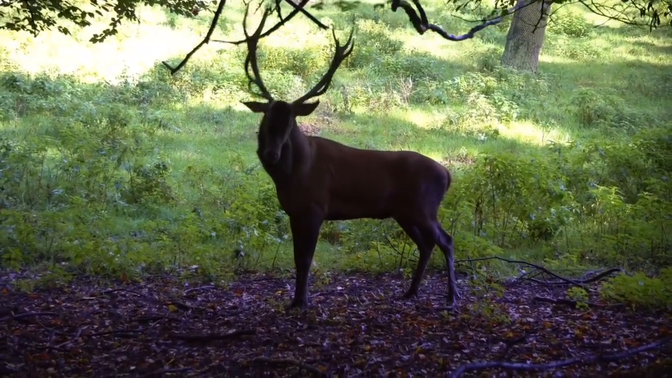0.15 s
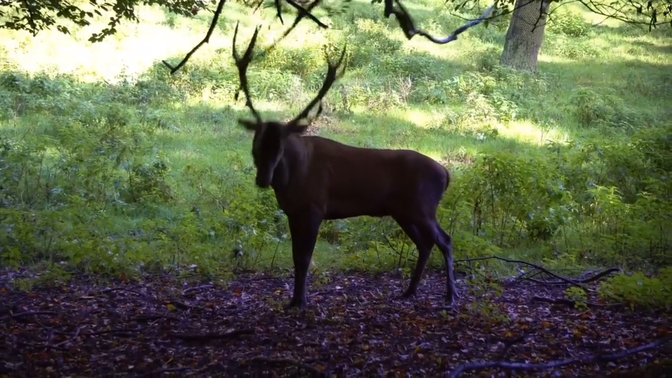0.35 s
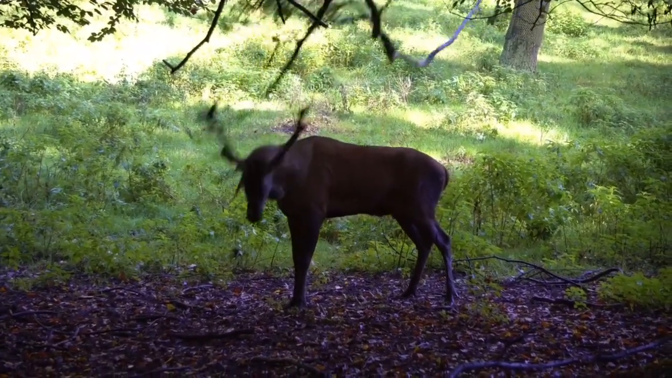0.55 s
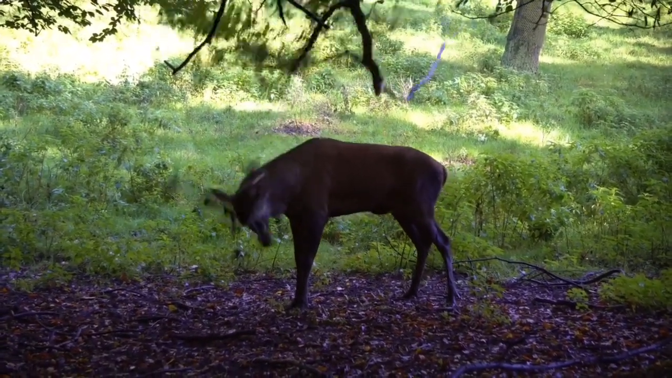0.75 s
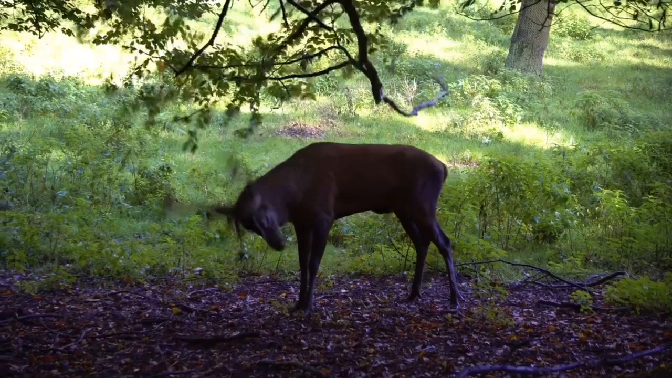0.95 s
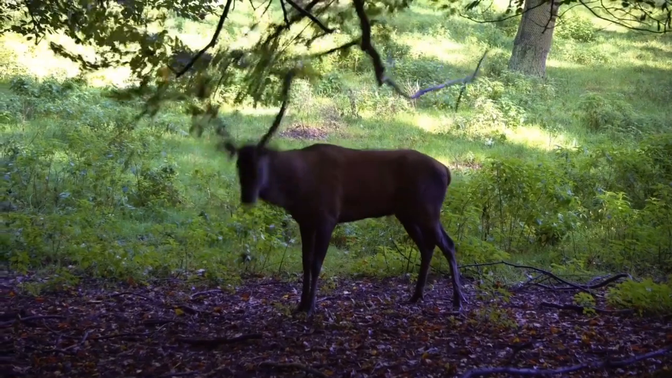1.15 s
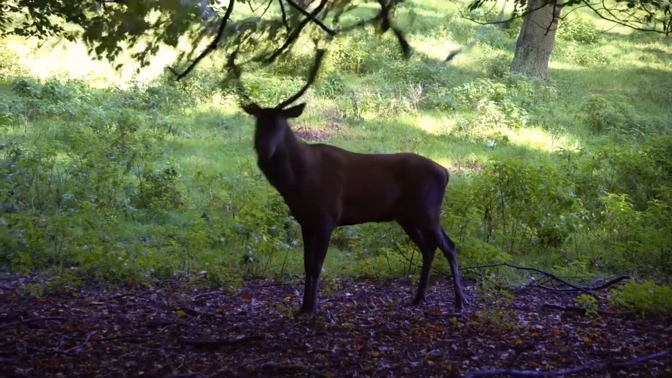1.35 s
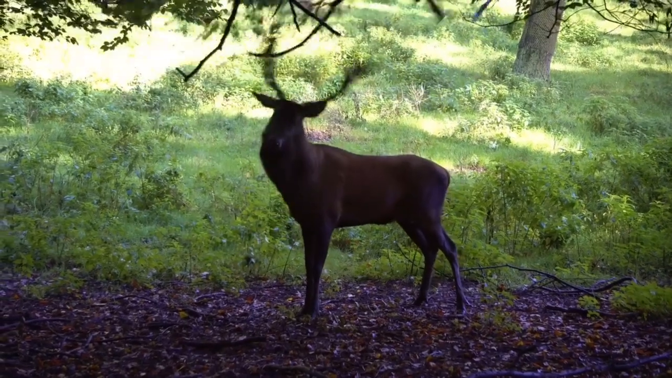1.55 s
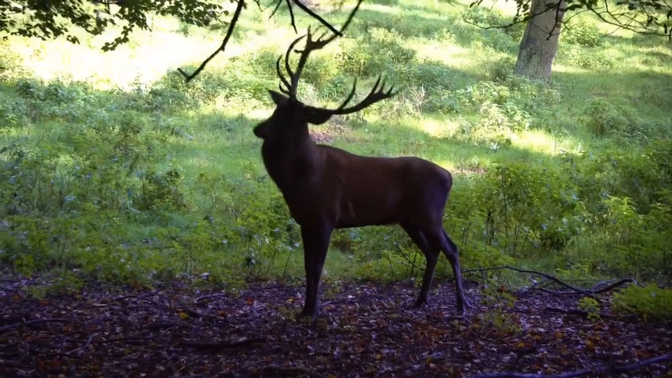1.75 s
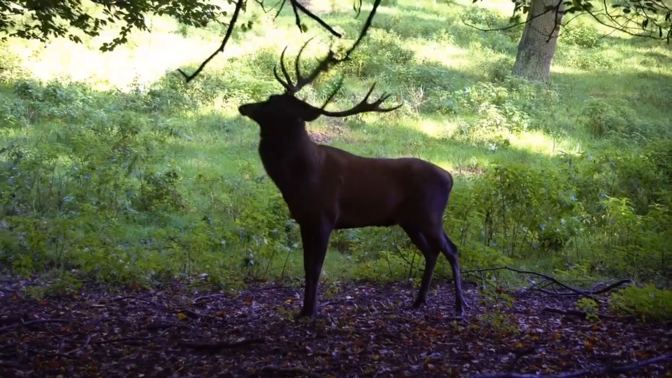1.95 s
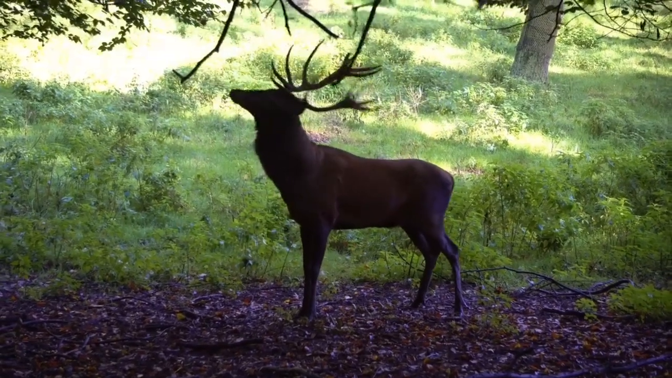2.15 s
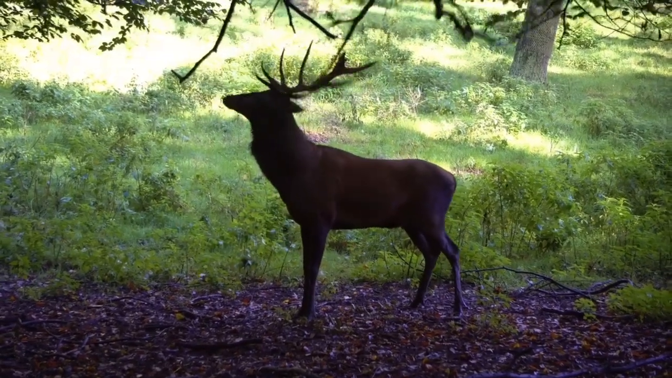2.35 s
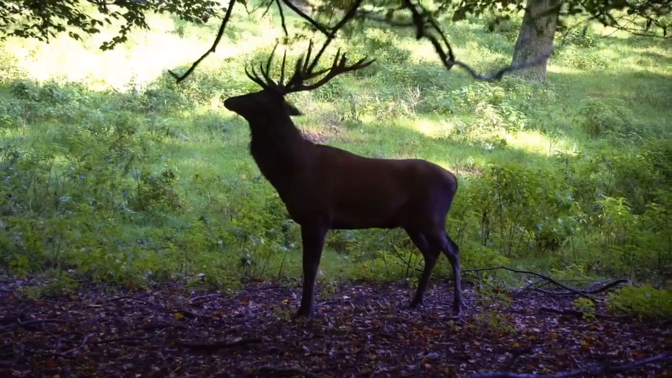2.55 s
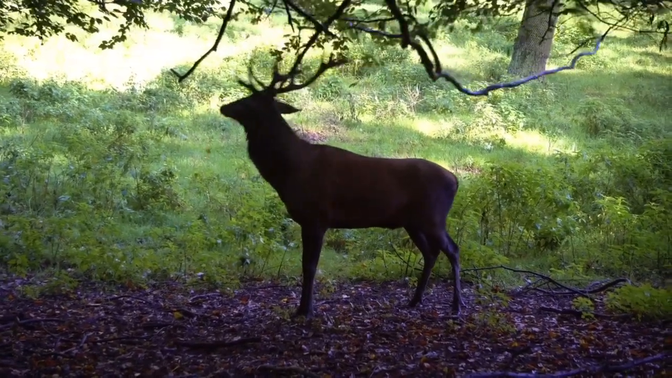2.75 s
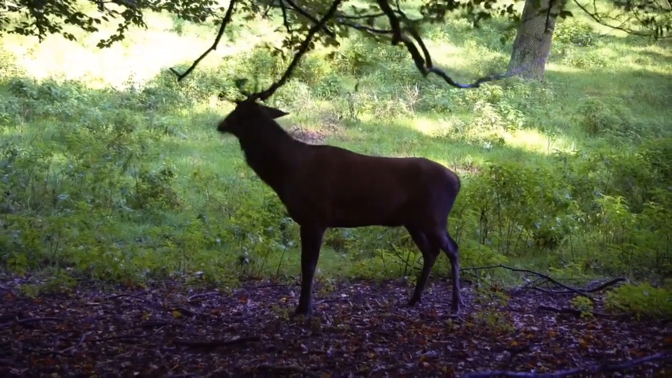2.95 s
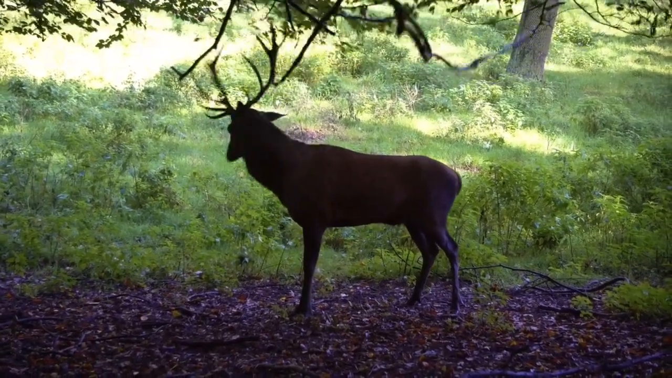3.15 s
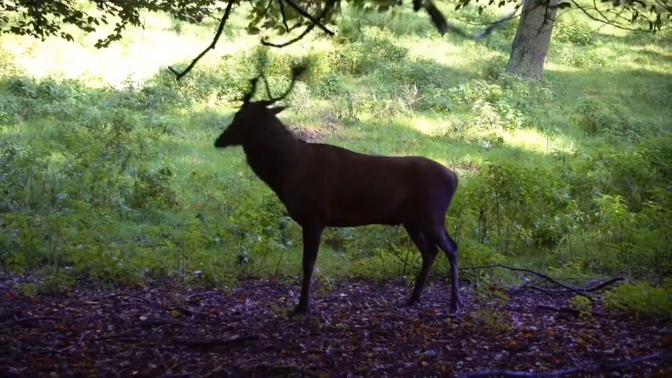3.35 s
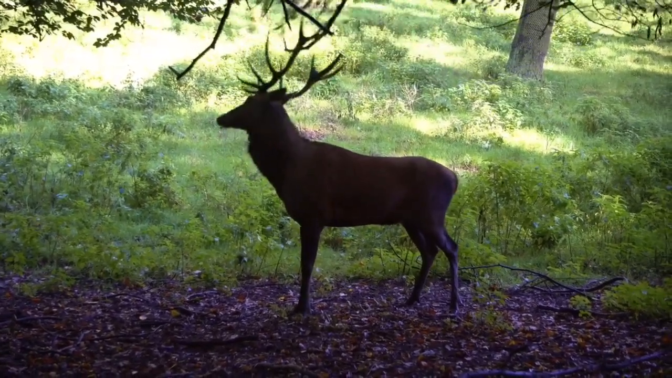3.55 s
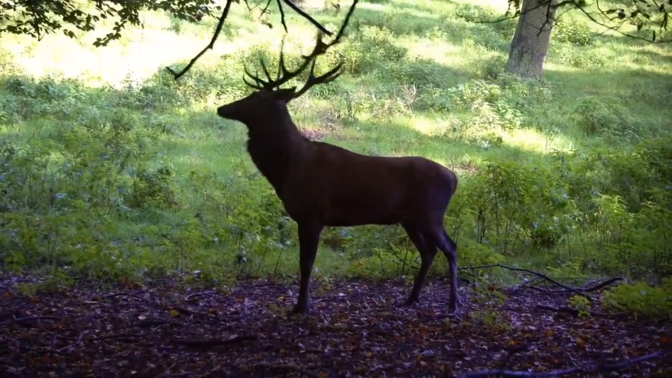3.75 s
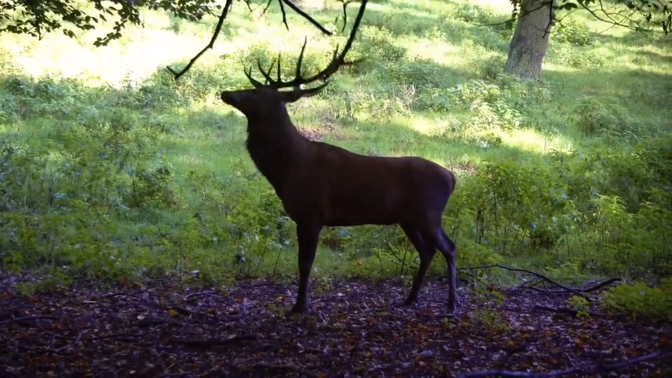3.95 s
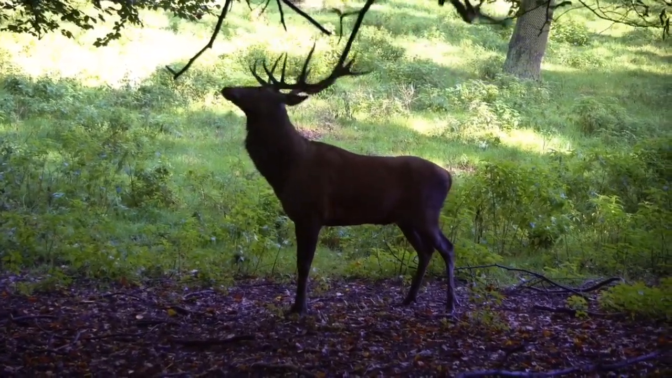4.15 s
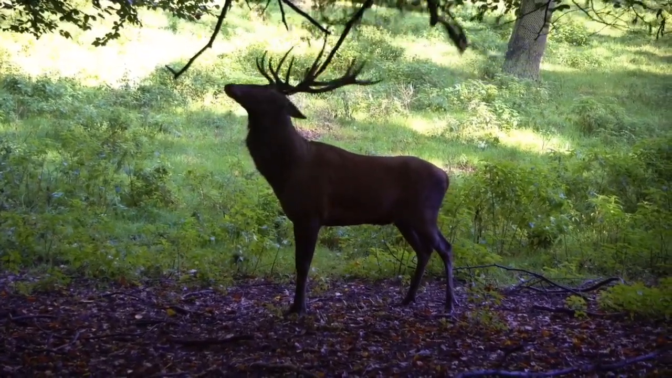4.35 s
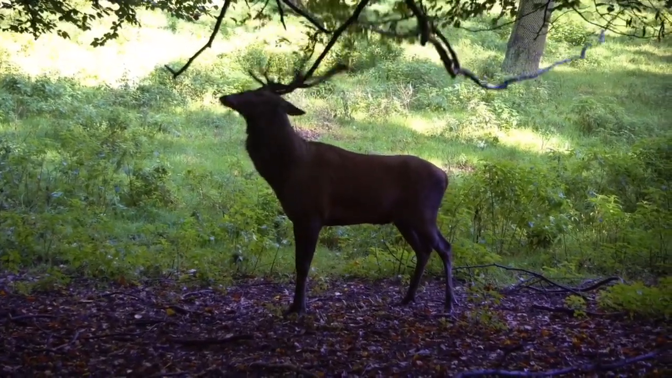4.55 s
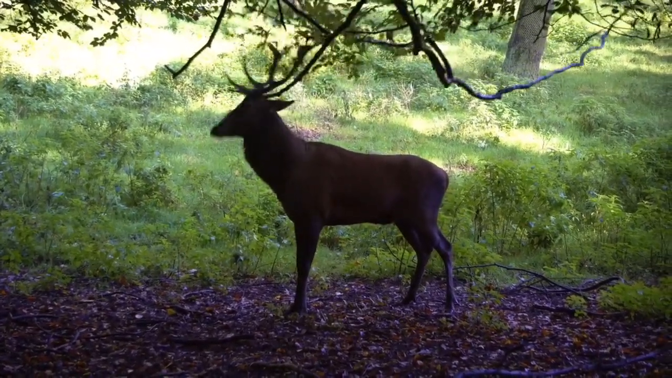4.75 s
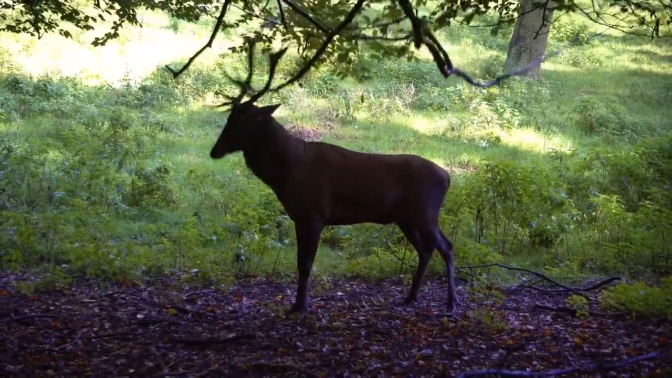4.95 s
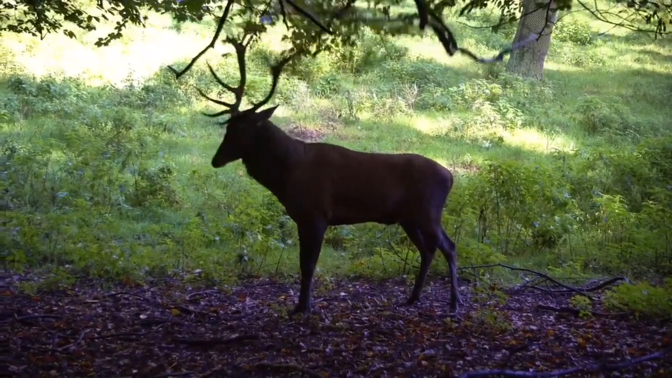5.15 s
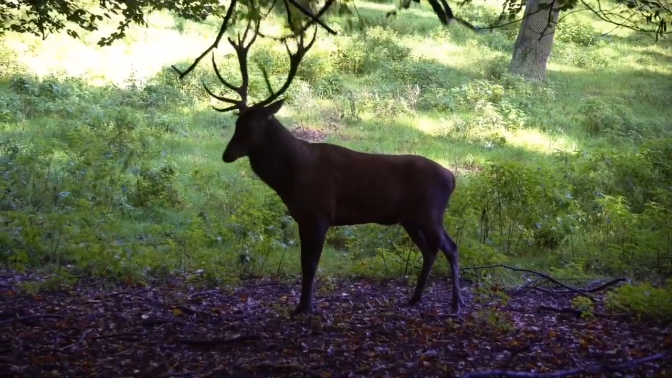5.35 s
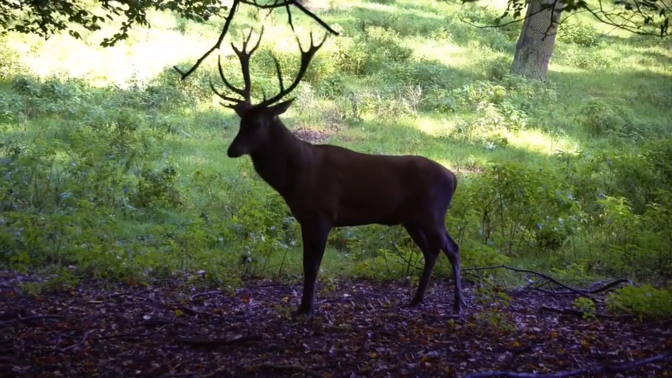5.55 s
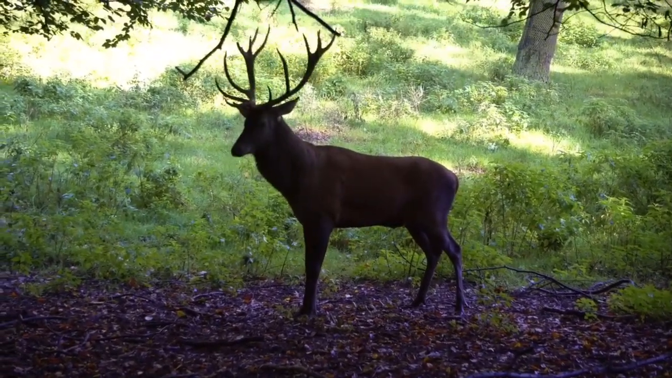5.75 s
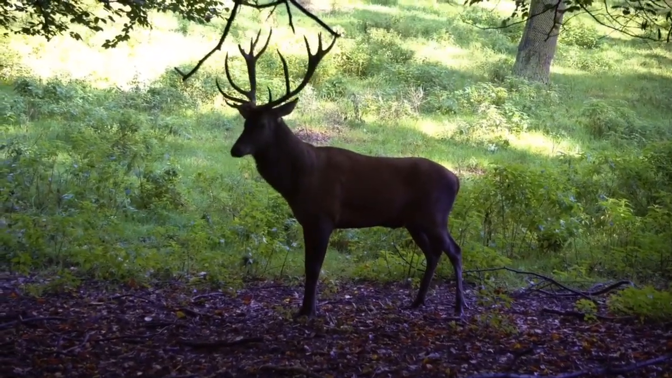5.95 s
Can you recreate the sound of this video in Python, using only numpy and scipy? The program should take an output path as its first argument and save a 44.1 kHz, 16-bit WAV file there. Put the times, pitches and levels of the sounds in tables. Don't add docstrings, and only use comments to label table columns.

```python
import sys
import numpy as np
from scipy import signal
from scipy.fft import rfft, irfft
from scipy.io import wavfile
from scipy.ndimage import uniform_filter1d

SR = 44100
rng = np.random.default_rng(int(sys.argv[2]) if len(sys.argv) > 2 else 0)


def volts(x):
    e = np.asarray(x, float) / 20
    return 10 ** e


def digitize_waveform(pressure):
    field = np.atleast_2d(pressure).T
    bounded = np.clip(field, -1, 1)
    quanta = np.round(bounded * 32767).astype(np.int16)
    wavfile.write(sys.argv[1], SR, quanta)


N = 264159

# frequency in Hz, level in dB, t60 in seconds.
WOOD_MODES = [(195, -9, .14), (257, -8, .13), (369, 2, .15), (450, -5, .07), (529, -1, .13), (615, -1, .12),
              (700, -5, .07), (769, 1, .13), (855, -6, .07), (938, -4, .08), (1065, -5, .05),
              (1170, -3, .06), (1320, -6, .045), (1440, -4, .05), (1690, -5, .035), (1830, -7, .03),
              (2070, -6, .03), (2400, -9, .025), (2900, -10, .02), (3400, -13, .02)]
# start in seconds, peak in dB, centre of the ring in Hz,
# damping by the antler as a factor on t60.
KNOCKS = [(0.354, -47, 780, 0.72), (0.526, -52, 377, 0.37), (0.662, -25.5, 1150, 0.52),
          (0.763, -36.5, 1280, 0.37), (1.193, -24.5, 1230, 0.86), (1.2, -18, 1720, 0.66),
          (1.344, -17.5, 930, 0.3), (1.405, -28.5, 1050, 0.3), (1.44, -27, 720, 0.69),
          (1.752, -39, 1110, 0.42), (1.841, -42, 810, 0.64), (2.567, -37.5, 1360, 0.53),
          (2.889, -40.5, 895, 1), (3.287, -15.5, 674, 0.99), (3.41, -13, 760, 0.5),
          (3.889, -45.5, 1350, 0.57), (5.25, -42.5, 470, 0.58), (5.484, -44, 424, 0.8),
          (5.5, -25.5, 1700, 0.38)]
KNOCK_SPREAD_OCT, KNOCK_MS = 0.89, 4.76
# start in seconds, peak in dB, centre in Hz, spread in octaves.
GRINDS = [(0.426, -32.5, 1010, 1.6), (1.361, -33, 1090, 1.1), (1.655, -37, 500, 1.57),
          (2.315, -35.5, 470, 2.5), (2.344, -30.5, 463, 2.1), (2.371, -24.5, 940, 0.76),
          (2.414, -28, 1110, 1.1), (2.658, -45.5, 1460, 0.9), (3.102, -40.5, 910, 1.2),
          (3.31, -18, 740, 1.8), (3.439, -26.5, 770, 1.5), (3.682, -34, 690, 2.1), (4.272, -36, 900, 3.1),
          (4.292, -30, 900, 3.3), (4.997, -38, 750, 2.5)]
GRIND_MS, GRIND_DAMPING = 11.83, 0.41
# start in seconds, peak in dB, centre in Hz, spread in octaves.
TAPS = [(2.384, -31, 590, 0.64), (2.426, -29, 1060, 0.29), (3.181, -36.5, 870, 0.41), (4.3, -36, 603, 0.41),
        (5.011, -36, 790, .8), (5.067, -48.5, 765, 0.33), (5.091, -35.5, 770, .6),
        (5.284, -30.5, 620, 0.27), (5.325, -37, 615, 0.37)]
TAP_MS, TAP_DAMPING = 6.22, 0.64
# hardest push in seconds, level in dB, seconds to build 20 dB,
# seconds to lose 20 dB.
DRAGS = [(0.01, -58, -5, -0.5), (0.63, -47, 0.47, 0.43), (1.37, -37.5, 0.26, 0.3), (1.7, -48, -0.2, 0.32),
         (2.53, -53, 0.9, 1), (3.35, -42, .4, -0.07), (3.57, -43, -0.3, 0.76), (5.59, -47, -1.2, -1)]
WOOD_CUT_HZ = 248
# start in seconds, peak in dB, centre in Hz, strength of its echo in dB.
CRACKS = [(0.428, -39.5, 2170, 1), (0.6614, -27, 1500, -2.5), (1.2021, -8, 2520, -5.5),
          (1.238, -32, 2880, 12.5), (1.3471, -14.5, 1960, -7.5), (1.4433, -30, 1520, 1),
          (1.7493, -37, 1560, 3.5), (2.329, -37, 1310, 4), (2.3842, -30, 2270, 1.5),
          (2.4248, -28, 1870, -8), (2.6718, -37, 1670, -8), (2.718, -28, 3400, -24),
          (2.7463, -37, 1910, -19), (2.8898, -43, 3750, -3), (3.2249, -30.5, 1700, -1.5),
          (3.2924, -15, 2040, -7), (3.4135, -13.5, 1460, -6.5), (4.303, -39.5, 2000, -3.5),
          (4.9848, -42, 2980, -5), (5.2514, -42.5, 2160, -10), (5.2848, -22, 2180, -8),
          (5.4997, -25.5, 1950, -7)]
CRACK_SPREAD_OCT, CRACK_MS = 0.83, 3.2
THROWN_PITCH, THROWN_SPREAD = 0.83, 1.41
# time in seconds, level in dB.
SHAKE = [(0.0, -61.5), (0.33, -64.5), (0.43, -54.5), (0.57, -55), (0.72, -49), (0.86, -47), (0.95, -42.5),
         (1.17, -45.5), (1.38, -50), (1.72, -46), (1.97, -50.5), (2.38, -50), (2.62, -52), (2.87, -55.5),
         (3.17, -56), (3.97, -55.5), (4.4, -59), (5.99, -56.5)]
# start in seconds, peak in dB, dying time (t60) in seconds, first tick
# in dB (16 makes it as strong as the burst).
FLICKS = [(0.4294, -43, 0.087, 5), (0.5554, -45, 0.12, 1.5), (0.6646, -36, 0.094, 3),
          (0.7614, -31.5, 0.33, 3), (0.938, -42, 0.9, 3), (1.3473, -33.5, 0.2, -6), (1.732, -39, 0.068, -1),
          (1.7905, -38, 0.1, 0), (2.2828, -37.5, 0.32, 35), (2.501, -39, 0.33, 0), (2.6718, -37, 0.061, 12),
          (2.7163, -26.5, 0.2, -3), (2.745, -21.5, 0.35, -13), (2.891, -38, 0.26, -4),
          (3.1115, -44, 0.51, -2), (3.1994, -32.5, 0.5, -5), (3.224, -29.5, 0.12, -10),
          (3.293, -31, 0.46, 1.5), (3.411, -30.5, 0.29, 29), (3.8965, -38.5, 0.14, 3),
          (3.991, -42, 0.078, 10), (4.868, -40, 0.16, -8), (5.106, -38, 0.13, -5), (5.1826, -60, 0.043, 6),
          (5.5024, -40.5, 0.6, 0), (5.738, -38.5, 0.78, -6)]
FLICK_RISE_S = 0.0067
# frequency in Hz, level in dB per Hz.
THIN_COLOUR = [(1500, -31), (2500, -6), (3400, -2), (4500, -3), (6500, -4.5), (9000, -3.5), (12800, -7.5),
               (16000, -12)]
# frequency in Hz, level in dB per Hz.
BIG_COLOUR = [(180, -68), (300, -30), (590, -1), (828, -9.5), (962, -1), (2230, 4.5), (2940, 0.5),
              (3370, 1.5), (6000, -15.5), (7800, -48), (13200, -120)]
# start in seconds, level in dB, top pitch in Hz, length in seconds.
NOTES = [
    (3.139, -45, 6900, .03),
    (3.237, -41, 7300, .026),
    (3.329, -43, 7000, .02),
]
# frequency in Hz, t60 in seconds, level in dB.
TREES = [(310, 0.43, 1), (1080, 0.62, -3.5), (1850, 0.71, -0.5), (3400, 0.56, 3), (4370, 0.8, -3.5),
         (6600, 0.66, 2), (10400, 0.37, -0.5)]
# frequency in Hz, level in dB per Hz.
FAR_COLOUR = [(15, -53), (25, -19), (49, 2), (170, -11), (363, -1.5), (591, 1.5), (659, 3), (1370, -2),
              (2110, -11), (6050, -9.5), (9320, -5.5), (14800, -12), (16000, -7)]
FAR_DB = -60
# frequency in Hz, likeness from 0 to 1.
SAME = [(60, 0.93), (130, 0.81), (290, 0.26), (640, 0.15), (1410, 0.56), (3100, 0.28), (6820, 0.81),
        (15000, 0.94)]
# frequency in Hz, left minus right in dB.
LEAN = [(60, 5), (180, -1.5), (550, -0.4), (1650, -3), (4970, -0.1), (15000, -1.8)]


def evened(x):
    return x / np.sqrt(np.mean(x ** 2) + 1e-20)


def read(points, hz):
    f, value = np.transpose(points)
    return np.interp(np.log(hz + 1), np.log(f + 1), value)


def add(mix, s, sound):
    part = mix[round(s * SR):][:len(sound)]
    part += sound[:len(part)]


def ring(db, damping, contact):
    hz, own_db, t60 = np.array(WOOD_MODES).T[:, :, None]
    t = np.arange(6000) / SR
    modes = volts(-60 * t / (t60 * damping)) * np.sin(2 * np.pi * hz * t)
    force = contact * rng.standard_normal((len(WOOD_MODES), len(contact)))
    modes = signal.fftconvolve(modes, force, axes=1)
    modes /= abs(modes).max(1, keepdims=True)
    return (volts(own_db + db) * modes).sum(0)


def knock(peak_db, centre_hz, spread, contact_ms, damping):
    octaves = np.log2(np.array(WOOD_MODES)[:, :1] / centre_hz) / spread
    u = np.arange(3000) / SR / (contact_ms / 1000)
    body = ring(-6 * octaves ** 2, damping, u ** 2 * np.exp(-2 * u))
    return volts(peak_db - 2.0) * body / abs(body).max()


def drag():
    t, push = np.arange(N) / SR, np.zeros(N)
    for s, db, build, lose in DRAGS:
        before = (s - t) / max(build, .01)
        after = (t - s) / max(lose, .01)
        push += volts(db - 20 * np.maximum(before, after))
    slips_per_s = 900
    slips = rng.standard_normal(N) * (rng.random(N) < slips_per_s / SR) * np.sqrt(SR / slips_per_s)
    octaves = np.log2(np.array(WOOD_MODES)[:, :1] / 700)
    bark = ring(-3 * octaves ** 2, 0.46, np.ones(1))
    return signal.oaconvolve(slips * push * volts(-10), bark / np.linalg.norm(bark))[:N]


def antlers():
    out = np.zeros(N)
    blows = [(s, db, hz, KNOCK_SPREAD_OCT, KNOCK_MS, damping) for s, db, hz, damping in KNOCKS]
    blows += [(*row, GRIND_MS, GRIND_DAMPING) for row in GRINDS]
    blows += [(*row, TAP_MS, TAP_DAMPING) for row in TAPS]
    for s, peak_db, hz, spread, contact_ms, damping in blows:
        lead = 0.252 * contact_ms / 1000
        add(out, s - lead, knock(peak_db, hz, spread, contact_ms, damping))
    out += drag()
    return signal.sosfilt(signal.butter(3, WOOD_CUT_HZ, "high", fs=SR, output="sos"), out)


def twigs():
    out, hz = np.zeros((2, N)), np.fft.rfftfreq(2048, 1 / SR)
    lead = 300 / SR
    t = np.arange(2048) / SR - lead
    u = np.maximum(t, 0) / (CRACK_MS / 1000)
    fade = np.exp(np.minimum(t, 0) / 0.0018 - 0.55 * u)
    for s, peak_db, centre_hz, echo_db in CRACKS:
        fibres = rfft(np.sqrt(u) * np.exp(-u) * rng.standard_normal(2048))
        fibres /= abs(fibres) ** .85 + 1e-12
        centres = centre_hz * np.array([[1], [THROWN_PITCH]])
        octaves = np.log2((hz + 1) / centres) / (CRACK_SPREAD_OCT * np.array([[1], [THROWN_SPREAD]]))
        hump = volts(-6 * octaves ** 2 - 7.3 * np.maximum(octaves, 0))
        crack, thrown = irfft(fibres * hump) * fade
        add(out[0], s - lead, volts(peak_db + 1) * crack / abs(crack).max())
        add(out[1], s - lead, volts(peak_db + 1 + echo_db) * thrown / abs(thrown).max())
    return out


def rustle(colour, ticks_per_s, spread_db, smooth, patchy_db, flicker_db):
    ticks = rng.standard_normal((2, N)) * (rng.random(N) < ticks_per_s / SR)
    ticks *= volts(spread_db * np.minimum(rng.exponential(1, N), 3))
    raw = evened(ticks) + smooth * rng.standard_normal((2, N))
    hz, t, (left, other) = signal.stft(raw, SR, nperseg=512, noverlap=384)
    patches = uniform_filter1d(rng.standard_normal(left.shape), 6, 0)
    patches = evened(uniform_filter1d(patches, 8, 1))
    flicker = evened(uniform_filter1d(rng.standard_normal(len(t)), 5))
    same = np.clip(read(SAME, hz), 0, 1)[:, None]
    z = np.array([left, same * left + np.sqrt(1 - same ** 2) * other])
    z *= volts(read(colour, hz)[:, None] + patchy_db * patches + flicker_db * flicker)
    return evened(signal.istft(z, SR, nperseg=512, noverlap=384)[1][:, :N])


def leaves():
    burst, tick, t = np.zeros(N), np.zeros(N), np.arange(SR // 2) / SR
    for s, peak_db, t60, tick_db in FLICKS:
        swell = np.minimum(t / FLICK_RISE_S, 1)
        dying_db = -60 * np.maximum(t - FLICK_RISE_S, 0) / t60
        add(burst, s - FLICK_RISE_S, volts(peak_db - 13 + dying_db) * swell)
        add(tick, s, volts(peak_db - 29 + tick_db - 60 * t / 0.0085))
    thin = rustle(THIN_COLOUR, ticks_per_s=2500, spread_db=0, smooth=1.32, patchy_db=1.37, flicker_db=0.27)
    big = rustle(BIG_COLOUR, ticks_per_s=1500, spread_db=2, smooth=3, patchy_db=2.5, flicker_db=1.7)
    shake_db = np.interp(np.arange(N) / SR, *np.transpose(SHAKE))
    big_db = -53.5 + 0.9 * (shake_db + 50.5)
    return thin * (volts(shake_db) + burst + tick) + big * (volts(big_db) + 0.53 * burst)


def bird():
    out = np.zeros(N)
    for s, db, top_hz, length in NOTES:
        u = np.arange(0, length, 1 / SR) / length
        hz = top_hz * np.interp(u, [0, .3, 1], [.86, 1, .81])
        whistle = np.sin(2 * np.pi * np.cumsum(hz) / SR)
        add(out, s, volts(db) * whistle * signal.windows.tukey(len(u), .4))
    return out


def clearing(x):
    taps = np.zeros((2, SR))
    at = np.arange(300, SR - 20, 20) + rng.integers(0, 20, (2, (SR - 301) // 20))
    np.put_along_axis(taps, at, rng.choice([-1., 1.], at.shape), 1)
    hz, t, (left, other) = signal.stft(taps, SR, nperseg=256)
    same = 1 / (1 + (hz[:, None] / 3500) ** 0.45)
    z = np.array([left, same * left + np.sqrt(1 - same ** 2) * other])
    z *= 1 - 0.077 * np.exp(-t / 0.0047)
    t60, colour_db = (read([(row[0], row[k]) for row in TREES], hz)[:, None] for k in (1, 2))
    tail = signal.istft(z * volts(colour_db - 60 * t / t60), SR, nperseg=256)[1]
    return signal.fftconvolve(x[None], tail / np.linalg.norm(tail[0]), axes=1)[:, :N]


def far_leaves():
    return volts(FAR_DB) * rustle(FAR_COLOUR, ticks_per_s=3500, spread_db=1.5, smooth=3.5,
                                patchy_db=-0.1, flicker_db=-0.3)


def scene():
    wood, (cracks, thrown), song = antlers(), twigs(), bird()
    echoes = clearing(volts(-11) * wood + thrown + volts(-2.5) * song)
    direct = wood + cracks * volts([[.8], [-.8]]) + song * volts([[2.5], [-2.5]])
    return direct + leaves() + echoes + far_leaves()


def roll_off(x):
    return signal.sosfilt(signal.butter(12, 16650, fs=SR, output="sos"), x)


def record(dry):
    hz = np.fft.rfftfreq(N, 1 / SR)
    bass_cut = 1 / np.sqrt(1 + (190 / (hz + 1)) ** 4)
    lean = volts(np.outer([.5, -.5], read(LEAN, hz)))
    thuds = irfft(rfft(dry[0]) * (hz < 1000), N)
    thud_level = np.sqrt(abs(uniform_filter1d(thuds ** 2, 2500)))
    shake = volts(-90) + volts(-24) * thud_level
    rumble = rfft(shake * rng.standard_normal(dry.shape)) / (1 + (hz / 160) ** 2)
    heard = rfft(dry) * lean * bass_cut + rumble
    mix = irfft(heard * (hz < 15860), N)
    return roll_off(mix)


dry = scene()
out = record(dry)
digitize_waveform(out)
```